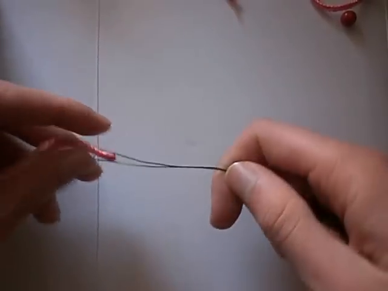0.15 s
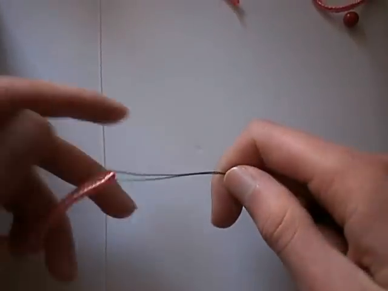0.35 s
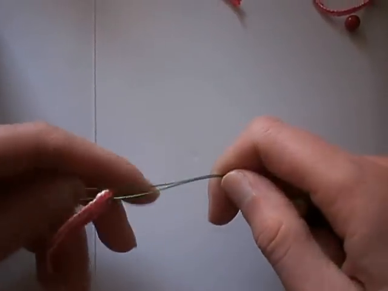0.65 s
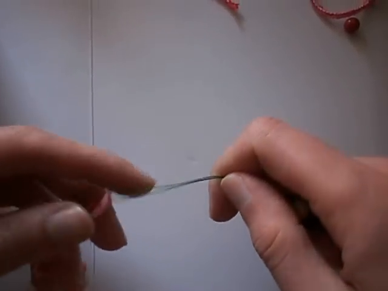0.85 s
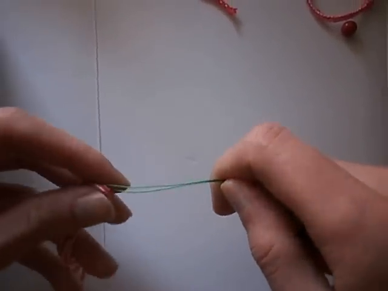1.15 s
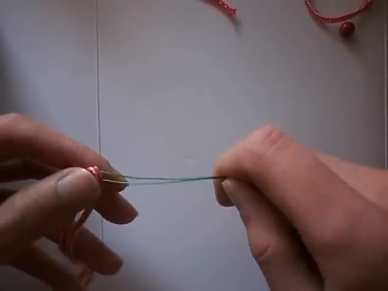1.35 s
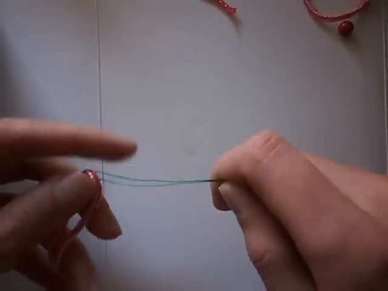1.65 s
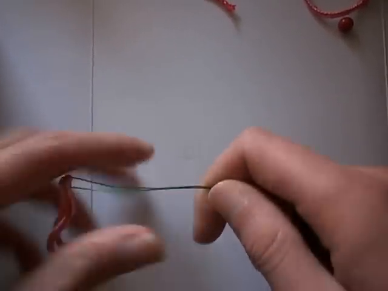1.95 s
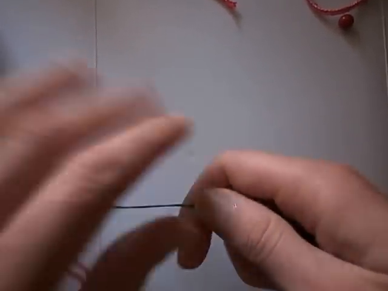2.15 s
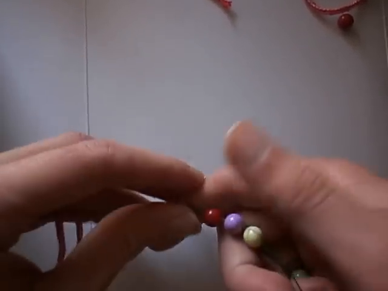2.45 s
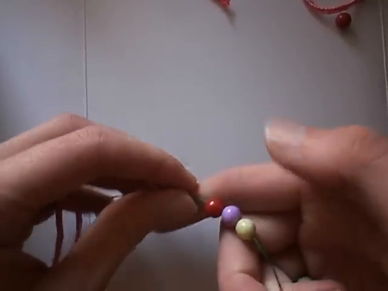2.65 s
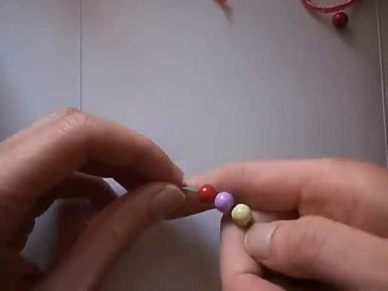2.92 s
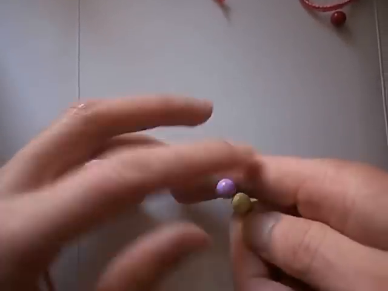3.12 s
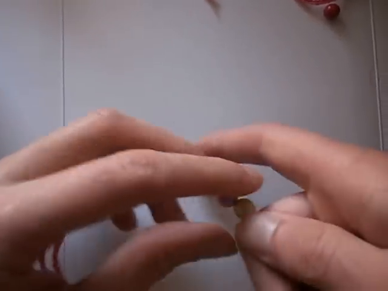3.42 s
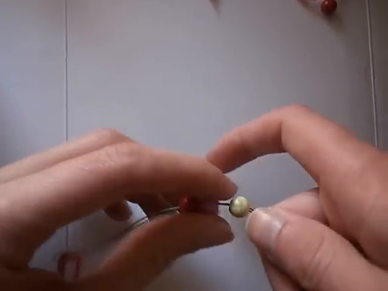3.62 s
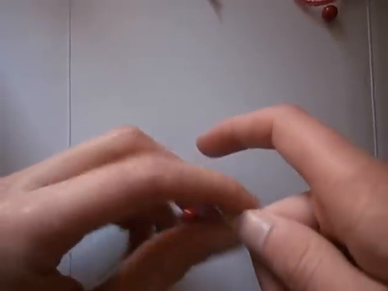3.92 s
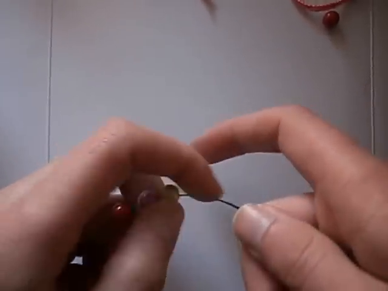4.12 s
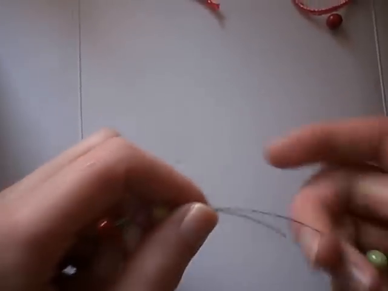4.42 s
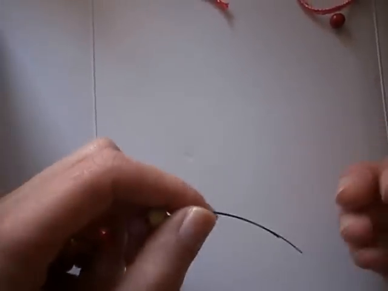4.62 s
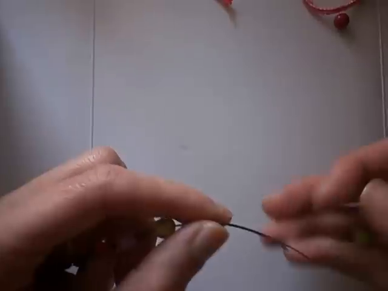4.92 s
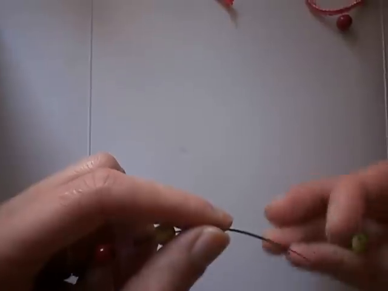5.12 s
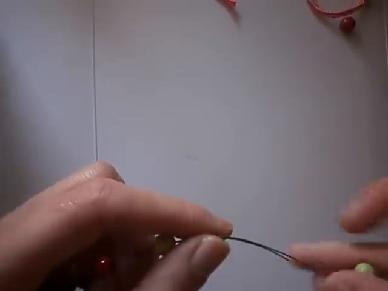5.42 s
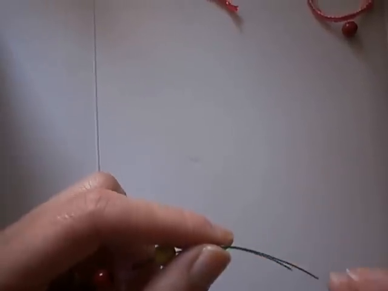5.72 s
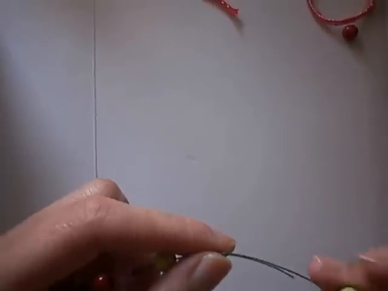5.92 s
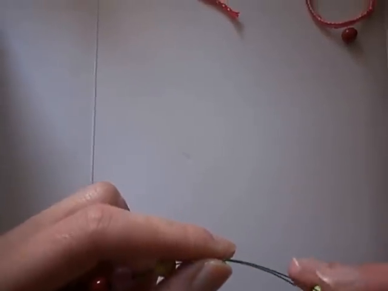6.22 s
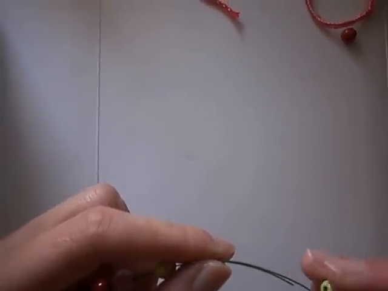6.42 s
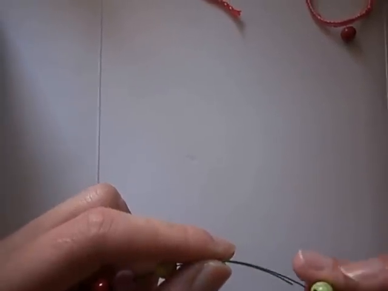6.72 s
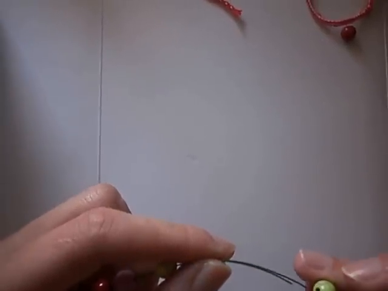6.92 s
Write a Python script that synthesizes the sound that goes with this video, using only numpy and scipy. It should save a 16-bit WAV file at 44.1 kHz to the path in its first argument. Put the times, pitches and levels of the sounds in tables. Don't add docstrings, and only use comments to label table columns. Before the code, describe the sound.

Small plastic beads click and tick on a thin wire, with a squeak, sharp knock and short scrape, over steady fan hum and hiss.

```python
import sys
import numpy as np
from scipy import signal
from scipy.fft import rfft, irfft, next_fast_len
from scipy.io import wavfile
from scipy.ndimage import uniform_filter1d

SR = 44100
rng = np.random.default_rng(int(sys.argv[2]) if len(sys.argv) > 2 else 0)


def natural_amplitude(level_db):
    exponent = np.asarray(level_db, float) / 20
    return 10 ** exponent


def unload_audio(sound):
    columns = np.transpose(np.atleast_2d(sound))
    steps = np.round(np.clip(columns, -1, 1) * 32767)
    wavfile.write(sys.argv[1], SR, steps.astype(np.int16))


N = 311430

# f/Hz, level per Hz/dB
FAN_AIR = [(18, -88), (110, -17), (260, -8), (416, -24.5), (483, -13), (1230, -22), (1600, -53),
           (3520, -110)]
# f/Hz, width/Hz, level/dB
FAN_ROOM = [(208.4, 38, -54), (246.9, 36, -50), (313.6, 52, -51), (402.5, 41.6, -50.5), (588.4, 63, -58)]
# f/Hz, rms level/dB
HUM = [(120.1, -61), (209.1, -53.5), (400, -58), (427.9, -52.5), (1140.9, -58.5)]
# t/s, level/dB
DRONE = [(0, -39), (0.18, -42), (0.27, -36), (0.49, -40), (0.6, -37.5), (1.16, -39), (1.32, -36),
         (1.65, -38.5), (2.18, -37), (2.3, -40), (2.8, -36.5), (3.46, -38), (4.23, -36.5), (4.68, -37),
         (4.8, -42.5), (4.91, -36.5), (5.6, -37.8), (7.06, -36.8)]
FAN_DB, DRONE_HZ, DRONE_WAVER_DB = -47, 249.65, .5

# f/Hz, level per Hz/dB
HISS = [(500, -7), (1200, -2.5), (1600, -1), (2300, -3), (3500, -9), (5000, -7), (6200, -11), (7600, -19)]
# offset from the centre/steps, level/dB
WHINE = [(-3.19, -13), (-2, -12), (-1, -11), (0, 0), (.245, -9), (1, -13), (3, -11), (4, -13)]
# f/Hz, width/Hz, level/dB
BUZZ_BAND = [(6580, 500, 0.0074), (7480, 330, 0)]
HISS_DB, WHINE_DB, BUZZ_DB = -52, -63.5, -66
WHINE_HZ, WHINE_STEP_HZ = 4986, 119.43
FRAME_HZ, BUZZ_START, BUZZ_SHARE = 30, .06, .62

# t/s, length/s, level/dB
RUSTLE = [
    (-0.4, .8, -53),
    (0.95, .9, -56),
    (1.9, 1.9, -56.5),
    (3.65, .95, -54),
    (4.7, 1.5, -59),
]
# f/Hz, width/Hz, level/dB
RUSTLE_BODY = [(2200, 820, 3), (4180, 1500, -2), (6200, 2900, -8)]
# t/s, length/s, f/Hz, level/dB
BRUSHES = [(0.0, .12, 4180, -52.5), (0.206, .15, 4500, -57), (0.327, .09, 5950, -57.5),
           (1.002, .16, 5960, -57.5), (2.25, 0.16, 5000, -64), (3.102, 0.032, 5600, -55),
           (3.432, 0.15, 6500, -62.5), (3.999, .1, 5600, -58), (4.455, 0.11, 6500, -62.5),
           (5.08, .38, 1940, -56.5), (0.28, .035, 2000, -50), (3.33, .25, 2000, -57)]

# t/s, peak level/dB, ring f/Hz, brightness/dB
TICKS = [(0.176, -36, 4250, -10), (0.469, -41, 3300, -17), (0.7524, -44, 5800, 6), (0.767, -38, 5700, -3),
         (2.309, -28.5, 5600, -1), (2.3701, -31.5, 5540, -5), (2.3755, -38, 5540, -9),
         (2.556, -46, 2200, -19), (2.637, -28, 5600, -5), (2.640, -29, 5600, -3), (2.699, -42.5, 5460, 5),
         (2.8333, -32, 5270, -3), (2.851, -44, 5500, 15), (3.476, -27.5, 5700, 18), (3.5, -42, 6700, -13),
         (3.519, -36, 5970, 10), (3.6232, -38, 4000, -16), (3.6916, -37, 4800, -6),
         (3.7173, -34.5, 4600, -1), (3.7259, -26, 3550, 14), (3.7262, -28, 6300, 12),
         (3.8372, -38.5, 6000, -5), (3.952, -35.5, 5500, 8), (4.0256, -38, 2700, -15),
         (4.05, -40, 5500, -8), (4.1556, -37, 5570, -2), (4.3675, -35.5, 5000, -18), (4.4, -44, 6500, 5),
         (5.488, -29.5, 4500, -7)]
TICK_T60_S, T60_S_PER_DB = .012, .0006
HOLLOW_DB, HOLLOW_SHARE, BRIGHT_DB, BRIGHT_SHARE = -6, .6, -7, .45

# t/s, level/dB, bright part level/dB, rise/s
CLOCK = [
    (0.264, -40, -12, 0.03),
    (1.254, -37.5, -7, 0.011),
    (2.255, -48, -7, .02),
    (3.254, -39.5, -5, 0.009),
    (4.256, -44, -8, 0.006),
    (5.251, -38.5, -8, 0.004),
    (6.252, -44.5, -19, .02),
]
# f/Hz, width/Hz, level/dB
CLOCK_CASE = [(1550, 260, 2.5), (1980, 230, 1.5), (2314, 380, 2), (2540, 150, -8.5), (2840, 290, 0)]
# f/Hz, width/Hz, level/dB
CLOCK_GEARS = [(3490, 300, -3.5), (4170, 920, -3), (4320, 850, 0.5), (5460, 250, -2.5)]
CLOCK_RATTLE_S, ROOM_T60_S, BRIGHT_T60_S = 0.018, 0.61, 0.39

# t/s, peak level/dB
SLIPS = [(3.0500, -34.5), (3.0560, -36), (3.0600, -38), (3.0625, -33), (3.0652, -28), (3.0735, -38),
         (3.0775, -35), (3.0805, -31), (3.0822, -26), (3.0865, -33), (3.0895, -38)]
# f/Hz, level/dB, t60/s
SLIP_RING = [(2300, 1, 0.01), (2680, -13, 0.0066), (3200, -11, .006), (5600, -17.5, .006),
             (6500, -14, .006)]
# f/Hz, width/Hz, level/dB
SQUEAK_BODY = [(2150, 850, 1.5), (3240, 1200, -8), (5600, 2400, -9)]
# t/s, level/dB
SCRAPE = [(3.250, -60), (3.261, -35), (3.277, -31), (3.285, -31), (3.292, -25), (3.298, -33),
          (3.306, -25.5), (3.320, -27), (3.326, -70)]
# f/Hz, width/Hz, level/dB
SCRAPE_BODY = [(707, 290, -14), (976, 220, 2), (1260, 300, -9), (2200, 470, -6), (3160, 670, -12),
               (4600, 1200, -21.5)]
# f/Hz, width/Hz, level/dB
SCRAPE_END_BODY = [(1840, 190, -11.5), (3340, 380, -3), (5600, 620, 5.5), (6520, 820, 1.5), (7430, 430, -3)]
DRAGS_FROM_S, DRAGS_TO_S = 3.0, 3.4
RUB_DB, RUB_RISE_S, RUB_FALL_S = -11, .0015, .002
GRIP_DB, GRIP_DB_PER_S, GRIP_FULL_S = -10, 330, 3.319

# t/s, peak level/dB
KNOCK = (3.1946, -12)
# f/Hz, level/dB, t60/s
KNOCK_MODES = [(1176, 3.5, 0.0093), (1650, -7, 0.007), (2260, -3, 0.007), (3140, -9, 0.006),
               (3850, -7, 0.005), (4600, -4, .006), (5600, -6, 0.0054)]

HANDS_ROOM_DB = -19.5
SAMPLING_HZ = 16000
# f/Hz, level/dB
ANTI_ALIAS = [(20, -2), (7400, 1.5), (7600, -7), (7700, -8), (7830, -23.5), (8000, -35.5)]
# f/Hz, level/dB
IMAGE = [(8000, -3), (8400, -6), (9000, -16), (9600, -28), (10000, -42), (10400, -70), (12000, -90)]
# f/Hz, width/Hz
NOTCHES = [(3935, 30), (5220, 30), (5905, 30)]


def rms_one(x):
    return x / np.sqrt(np.mean(x ** 2) + 1e-20)


def at_hz(points, hz):
    f, db = np.array(points).T
    return np.interp(np.log(hz + 1), np.log(f), db)


def level(rows):
    s, db = np.transpose(rows)
    return natural_amplitude(np.interp(np.arange(N) / SR, s, db, left=-200, right=-200))


def drift(rate):
    r = np.exp(-80 * np.pi * rate / SR)
    noise = rng.standard_normal(N // 40 + 4002)
    slow = signal.lfilter([1], [1, -2 * r, r * r], noise)[4000:]
    return np.interp(np.arange(N) / 40, np.arange(len(slow)), rms_one(slow - slow.mean()))


def coloured(spectrum):
    size = next_fast_len(N)
    hz = np.fft.rfftfreq(size, 1 / SR)
    white = rfft(rng.standard_normal(size))
    return rms_one(irfft(white * natural_amplitude(at_hz(spectrum, hz)), size)[:N])


def resonate(x, hz, width):
    r = np.exp(-np.pi * width / SR)
    poles = [1, -2 * r * np.cos(2 * np.pi * hz / SR), r * r]
    return signal.lfilter([(1 - r * r) / 2, 0, (r * r - 1) / 2], poles, x)


def body(x, peaks, sharp=False):
    out = 0
    for k, (hz, width, db) in enumerate(peaks):
        ring = resonate(x, hz, width)
        if sharp:
            ring = resonate(ring, hz, width)
        out = out + (-1) ** k * natural_amplitude(db) * ring
    return out


def grains(per_s, spread_db):
    sizes = natural_amplitude(spread_db * np.minimum(rng.exponential(1, N), 4))
    sizes = sizes * rng.choice([-1, 1], N)
    return sizes * (rng.random(N) < per_s / SR) + 1e-18


def stroke(s, length):
    return np.sin(np.pi * np.clip((np.arange(N) / SR - s) / length, 0, 1))


def fan():
    t, air = np.arange(N) / SR, rng.standard_normal(N)
    out = natural_amplitude(FAN_DB) * coloured(FAN_AIR)
    for hz, width, db in FAN_ROOM:
        out += natural_amplitude(db) * rms_one(resonate(resonate(air, hz, width), hz, width))
    for hz, db in HUM:
        out += np.sqrt(2) * natural_amplitude(db + drift(1.5)) * np.sin(2 * np.pi * hz * t + .3 * drift(1.2))
    drone_level = natural_amplitude(1.2 + DRONE_WAVER_DB * drift(4)) * level(DRONE)
    return out + np.sqrt(2) * drone_level * np.sin(2 * np.pi * DRONE_HZ * t + 0.23 * drift(1.2))


def camera():
    t = np.arange(N) / SR
    carrier = 2 * np.pi * WHINE_HZ * t + 1.44 * drift(1.7)
    whine = sum(natural_amplitude(db) * np.sin(carrier + 2 * np.pi * k * WHINE_STEP_HZ * t + k ** 2) for k, db in WHINE)
    whine = np.sqrt(2) * natural_amplitude(WHINE_DB + 1.5 * drift(8)) * whine
    reading = 1. * ((t * FRAME_HZ - BUZZ_START) % 1 < BUZZ_SHARE)
    reading = uniform_filter1d(reading, size=90)
    buzz = rms_one(body(rng.standard_normal(N), BUZZ_BAND))
    buzz = natural_amplitude(BUZZ_DB + 1.9 * drift(24)) * reading * buzz
    return natural_amplitude(HISS_DB) * coloured(HISS) + whine + buzz


def rustle():
    rub = grains(4000, spread_db=0.0)
    motion = sum(natural_amplitude(db) * stroke(s, length) ** 2 for s, length, db in RUSTLE)
    out = natural_amplitude(-2.5) * motion * rms_one(body(rub, RUSTLE_BODY))
    for s, length, hz, db in BRUSHES:
        span = slice(max(round(s * SR), 0), round((s + length) * SR))
        brush = rms_one(body(rub[span], [(hz, .3 * hz, 0)], sharp=True))
        out[span] += natural_amplitude(db) * stroke(s, length)[span] * brush
    return out


def ticks():
    out, t = np.zeros(N), np.arange(1500) / SR
    chatter = rng.standard_normal((len(TICKS), len(t)))
    chatter[:, 0] = 8.2
    for (s, peak_db, hz, brightness_db), shake in zip(TICKS, chatter):
        t60 = max(TICK_T60_S + T60_S_PER_DB * (peak_db + 40), .002)
        shake = shake * natural_amplitude(-60 * t / t60)
        parts = [(hz, 2200, 0),
                 (2600, 1800, HOLLOW_DB - HOLLOW_SHARE * brightness_db),
                 (6600, 1200, BRIGHT_DB + BRIGHT_SHARE * brightness_db)]
        tick = sum(natural_amplitude(db) * rms_one(body(shake, [(f, width, 0)], sharp=True)) for f, width, db in parts)
        at = round(s * SR)
        out[at:at + len(t)] += natural_amplitude(peak_db + 3.5) * tick / np.abs(tick).max()
    return signal.sosfilt(signal.butter(4, 6900, fs=SR, output="sos"), out)


def clock():
    since, dull, bright = np.arange(SR) / SR, np.zeros(N + SR), np.zeros(N + SR)
    for s, db, bright_db, rise_s in CLOCK:
        rise, at = natural_amplitude(db) * (1 - np.exp(-since / rise_s)), round(s * SR)
        dull[at:at + SR] += rise * (1.16 * np.exp(-since / CLOCK_RATTLE_S) + natural_amplitude(-60 * since / ROOM_T60_S))
        bright[at:at + SR] += rise * natural_amplitude(bright_db - 60 * since / BRIGHT_T60_S)
    band = signal.butter(2, [1300, 5600], "band", fs=SR, output="sos")
    rattle = signal.sosfilt(band, grains(4000, spread_db=2.2))
    case = rms_one(body(rattle, CLOCK_CASE) + 0.95 * body(rattle, CLOCK_CASE, sharp=True))
    gears = rms_one(body(rattle, CLOCK_GEARS))
    return 0.69 * dull[:N] * case + bright[:N] * gears


def squeak():
    out, t = np.zeros(N), np.arange(1000) / SR
    luck = rng.standard_normal((len(SLIPS), len(SLIP_RING), 3))
    for (s, peak_db), draws in zip(SLIPS, luck):
        at = round(s * SR)
        for (hz, db, t60), (strength, pitch, phase) in zip(SLIP_RING, draws):
            fade = natural_amplitude(peak_db + db + 1.5 + strength - 60 * t / t60) * (1 - np.exp(-t / .0006))
            out[at:at + len(t)] += fade * np.sin(2 * np.pi * hz * (1 + .03 * pitch) * t + 2 * phase)
    return out


def drags():
    out, span = squeak(), slice(round(DRAGS_FROM_S * SR), round(DRAGS_TO_S * SR))
    t, slips = (np.arange(N) / SR)[span], grains(3500, spread_db=2.6)[span]
    grip = natural_amplitude(GRIP_DB + GRIP_DB_PER_S * np.minimum(t - GRIP_FULL_S, 0))
    scrape = rms_one(body(slips, SCRAPE_BODY, sharp=True))
    scrape = scrape + grip * rms_one(body(slips, SCRAPE_END_BODY, sharp=True))
    scrape = scrape / (.5 + .5 * np.sqrt(uniform_filter1d(scrape ** 2, size=260)))
    swell = 0
    for s, db in SLIPS:
        distance = np.maximum((s - t) / RUB_RISE_S, (t - s) / RUB_FALL_S)
        swell = swell + natural_amplitude(db + RUB_DB) * np.exp(-distance)
    rub = rms_one(body(slips, SQUEAK_BODY, sharp=True))
    out[span] += swell * rub + level(SCRAPE)[span] * scrape
    return out


def knock():
    out, t = np.zeros(N), np.arange(2000) / SR
    rings = sum(natural_amplitude(db - 60 * t / t60) * np.sin(2 * np.pi * hz * t) for hz, db, t60 in KNOCK_MODES)
    crack = rms_one(body(rng.standard_normal(len(t)), [(2600, 4500, 0)], sharp=True))
    crack = natural_amplitude(-8 - 60 * t / 0.008) * crack
    at = round(KNOCK[0] * SR)
    out[at:at + len(t)] = natural_amplitude(KNOCK[1]) * (rings + crack) * (1 - np.exp(-t / .0003))
    return signal.sosfilt(signal.butter(2, [600, 6000], "band", fs=SR, output="sos"), out)


def room(x):
    t = np.arange(round(.4 * SR)) / SR
    tail = rng.standard_normal(len(t)) * natural_amplitude(-60 * t / BRIGHT_T60_S) * (t > .003)
    tail = resonate(tail, 2100, 3000)
    return signal.fftconvolve(x, tail / np.sqrt(np.sum(tail ** 2)))[:N]


def scene():
    hands = ticks() + drags() + knock()
    near = hands + natural_amplitude(HANDS_ROOM_DB) * room(hands) + rustle()
    return (near + clock() + fan() + camera())[None]


def top_cut(x):
    return signal.sosfilt(signal.butter(12, 15500, fs=SR, output="sos"), x)


def record(dry):
    size = next_fast_len(N)
    hz = np.fft.rfftfreq(size, 1 / SR)
    gaps = np.prod([1 - 0.74 / (1 + ((hz - f) / width * 2) ** 2) for f, width in NOTCHES], axis=0)
    low = rfft(dry[0], size) * natural_amplitude(at_hz(ANTI_ALIAS, hz)) * gaps * (hz < SAMPLING_HZ / 2)
    mirror = np.clip(np.round((SAMPLING_HZ - hz) * size / SR).astype(int), 0, None)
    image = np.conj(low[mirror]) * natural_amplitude(at_hz(IMAGE, hz)) * (hz >= SAMPLING_HZ / 2)
    mix = irfft(low + image, size)[:N] + natural_amplitude(-94) * rng.standard_normal(N)
    return top_cut(mix[None])


dry = scene()
out = record(dry)
unload_audio(out)
```